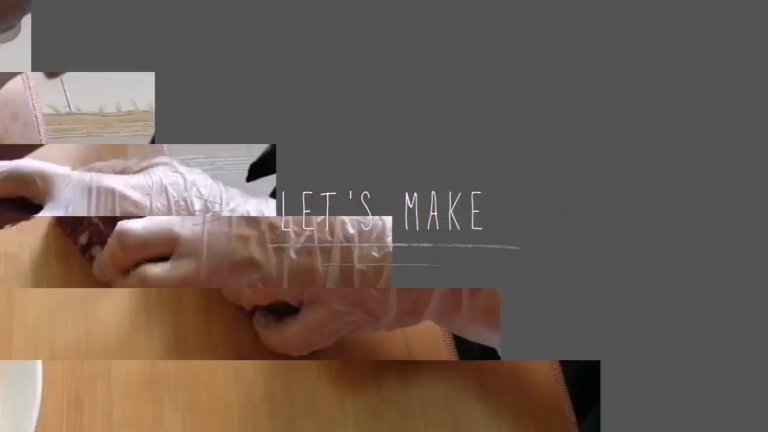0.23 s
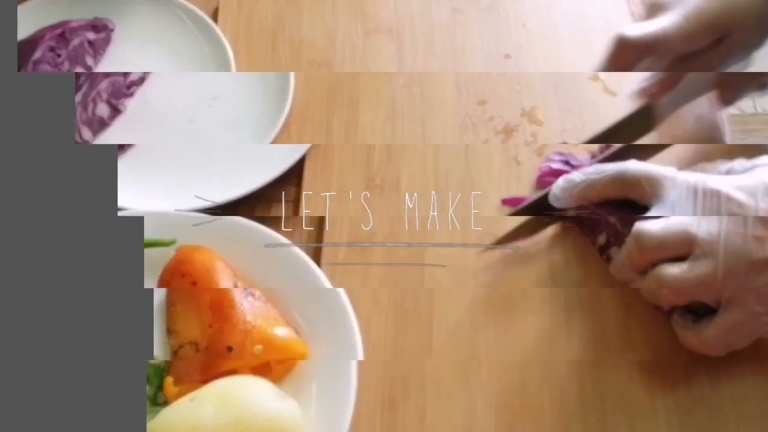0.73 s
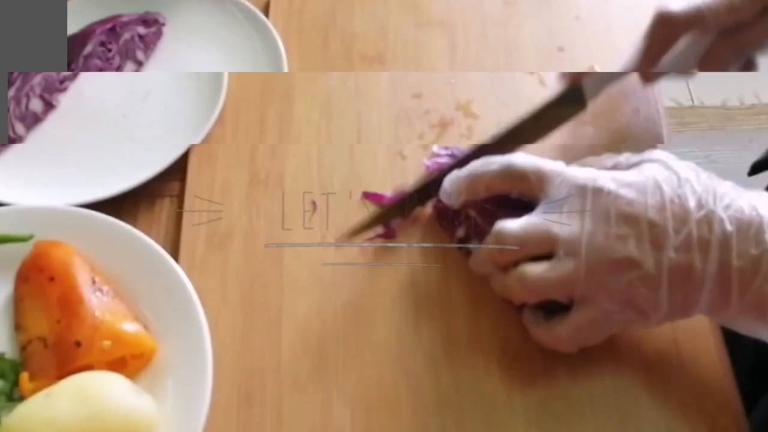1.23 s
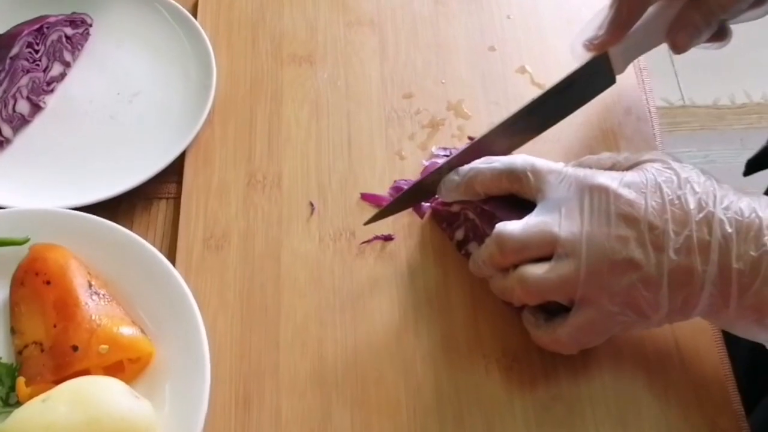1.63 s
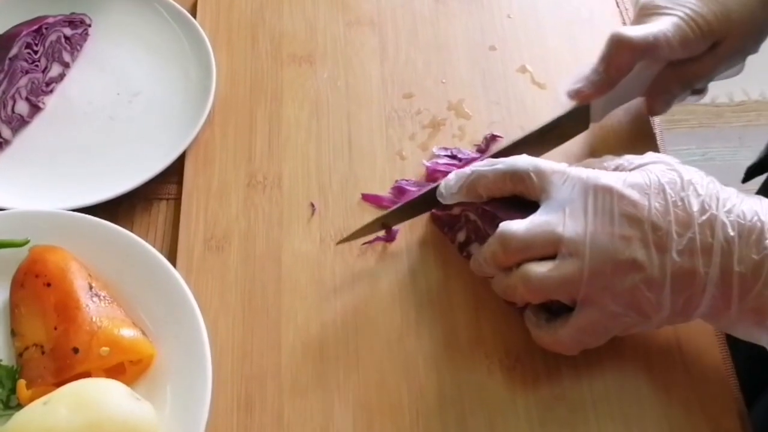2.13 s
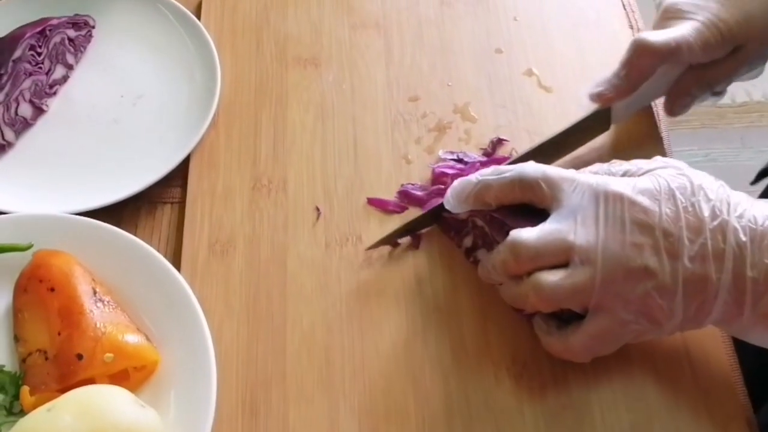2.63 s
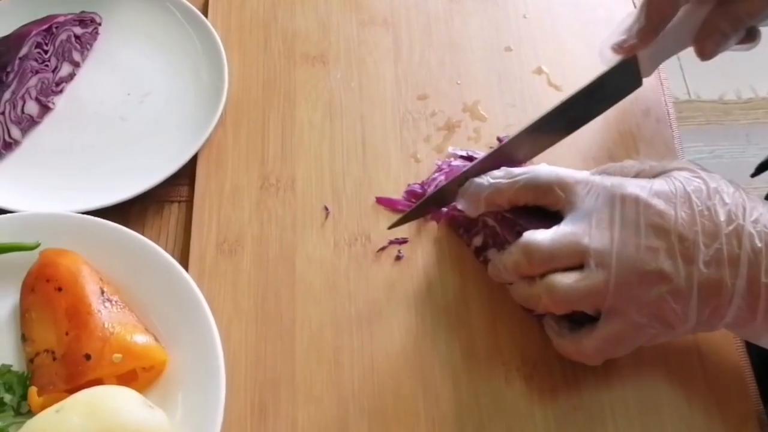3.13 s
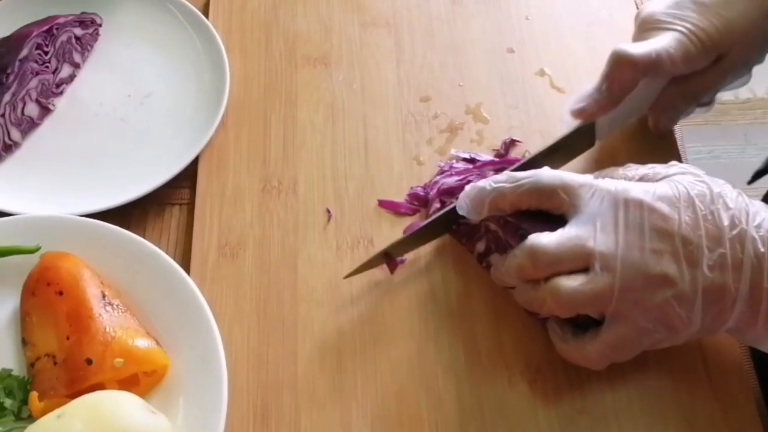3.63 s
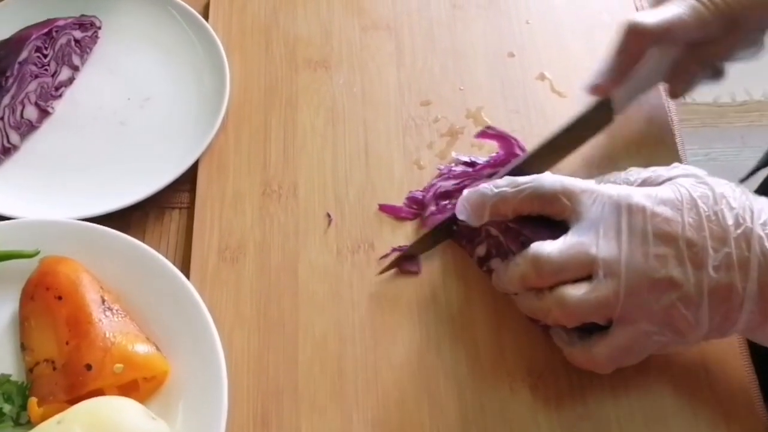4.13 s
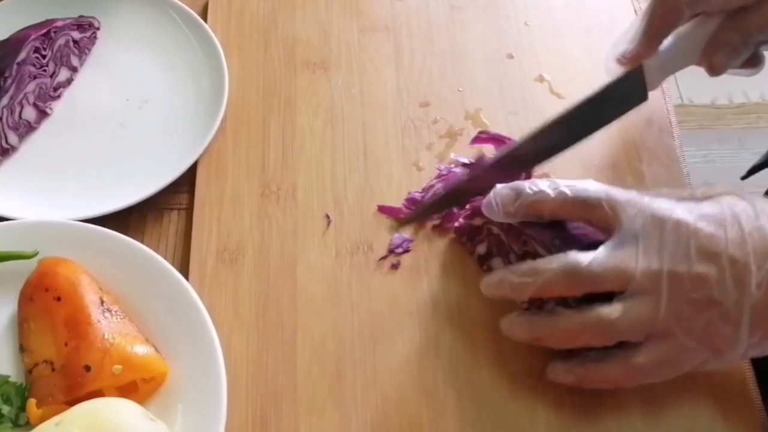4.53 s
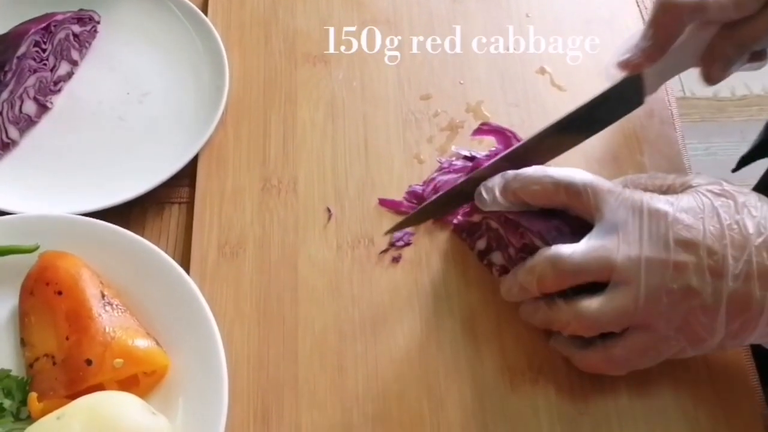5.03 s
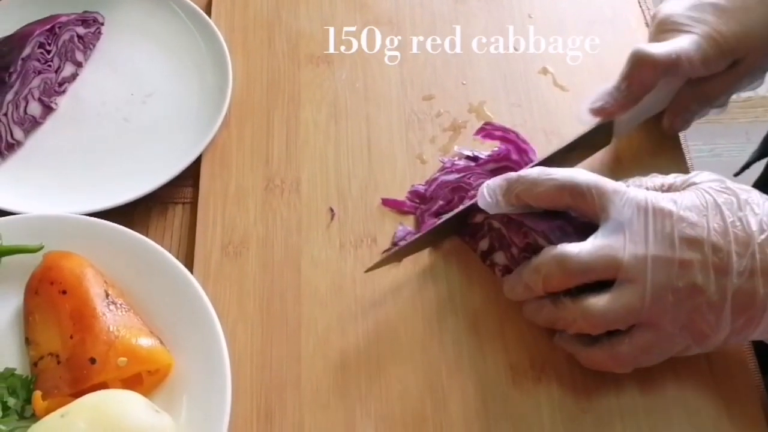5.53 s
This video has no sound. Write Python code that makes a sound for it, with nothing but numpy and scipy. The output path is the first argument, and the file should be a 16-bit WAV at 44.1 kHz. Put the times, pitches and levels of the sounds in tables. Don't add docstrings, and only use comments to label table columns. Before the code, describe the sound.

A knife cuts crisp cabbage on a small wooden board, heard close in stereo in a hard-walled kitchen. Uneven strokes crackle with tiny bright bursts and single snaps. Three short woody knocks end cuts near 1, 2.6 and 4 seconds, the second hardest and followed by a dull tap. Tearing is thickest after 5 seconds. Low room air and appliance hum lie underneath.

```python
import sys
import numpy as np
from scipy import signal
from scipy.fft import rfft, irfft
from scipy.io import wavfile
from scipy.ndimage import uniform_filter1d

SR = 44100
rng = np.random.default_rng(int(sys.argv[2]) if len(sys.argv) > 2 else 0)


def generate_wav(signal):
    frames = np.transpose(np.atleast_2d(signal))
    scaled = np.clip(frames, -1, 1) * 32767
    pcm = np.round(scaled).astype(np.int16)
    wavfile.write(sys.argv[1], SR, pcm)


def level_to_linear(level):
    exponent = np.asarray(level, float) / 20
    return 10 ** exponent


N = 254898


# full force at in seconds, swell in seconds, hold in seconds,
# tearing level in dB, board share in dB.
STROKES = [(0.463, 0.12, 0.054, -62, -2), (5.31, .05, 0.098, -64.5, -16), (0.714, 0.038, 0.052, -53, -12),
           (0.8, .01, 0.11, -67, -24), (1.059, .01, 0.094, -59.5, -1), (1.267, 0.14, 0.021, -59.5, -6),
           (1.978, .008, 0.075, -63.5, -1), (2.079, .003, 0.011, -53.5, -10),
           (2.26, 0.058, 0.043, -56.5, -3), (2.477, 0.17, .005, -65, -5), (3.336, 0.0027, .003, -72, -10),
           (3.476, .19, 0.026, -58.5, -7), (3.54, 0.034, 0.053, -61, -8), (3.658, 0.014, .035, -56.5, -7),
           (3.703, .012, 0.06, -53, 1.5), (4.027, .01, 0.044, -56.5, 1), (4.185, .014, 0.059, -67.5, 0.5),
           (4.275, .03, .05, -85, 1), (4.402, 0.034, .003, -65, -10), (5.122, 0.0079, 0.15, -62.5, -0.5),
           (5.254, .035, 0.019, -50.5, -6.5), (5.432, 0.09, 0.037, -49.5, 0), (5.72, 0.11, .02, -60.5, -2),
           (5.741, .006, .04, -53, 0.5)]
# frequency in Hz, gain in dB.
RIB_COLOUR = [(300, -42), (600, -10.5), (780, 1), (900, 2.5), (1100, -2.5), (1800, -8.5), (2600, -6.5),
              (3500, -6.5), (6000, -49)]
LEAF_COLOUR = [(500, -58), (1500, 0), (3000, -5), (5000, 4), (7000, -0.5), (9000, -10), (14000, -28.5)]
FIZZ_COLOUR = [(4000, -35.5), (7000, 2), (9000, 6), (12000, 5), (16000, -0.5)]


def tearing():
    fizz_db, release_db_per_s = -7.0, 404
    plunge_lead_s, plunge_db, plunge_board_db, plunge_fizz_db = 0.0044, -49, 1.5, -3.5
    t = np.arange(0, N, 32) / SR
    power = 0
    for full_s, swell_s, hold_s, db, board_db in STROKES:
        levels = level_to_linear([[db], [db + board_db], [db + fizz_db]])
        power = power + (force(t, full_s, swell_s, hold_s, release_db_per_s) * levels) ** 2
    plunge_levels = level_to_linear(plunge_db) * level_to_linear([[0], [plunge_board_db], [plunge_fizz_db]])
    for knock_s, *_, swell_s in KNOCKS:
        push = force(t, knock_s - plunge_lead_s, swell_s, plunge_lead_s, 10 * release_db_per_s)
        power = power + (push * plunge_levels) ** 2
    sample_s = np.arange(N) / SR
    leaf_level, rib_level, fizz_level = [np.interp(sample_s, t, row) for row in np.sqrt(power)]
    leaf, rib = cracks(5500), cracks(2000)
    shaking = 0.63 * leaf + 1.095 * rib
    leaf_sound = level_to_linear(-10.0) * signal.oaconvolve(leaf * leaf_level, unit(LEAF_COLOUR))[:N]
    rib_sound = level_to_linear(-9.0) * signal.oaconvolve(shaking * rib_level, unit(RIB_COLOUR))[:N]
    fizz_sound = level_to_linear(1.5) * signal.oaconvolve(leaf * fizz_level, unit(FIZZ_COLOUR))[:N]
    return leaf_sound + rib_sound + fizz_sound


def force(t, full_s, swell_s, hold_s, release_db_per_s, swell_db=23):
    climb_db = -swell_db * (np.maximum(full_s - t, 0) / swell_s)
    return level_to_linear(climb_db - release_db_per_s * np.maximum(t - full_s - hold_s, 0))


def cracks(per_s, uneven_db=3.5, clump_db=1.5):
    size = level_to_linear(uneven_db * np.minimum(rng.exponential(1, N), 4)) * rng.choice([-1., 1.], N)
    clumps = uniform_filter1d(rng.standard_normal(N), size=130)
    clumps = evened(uniform_filter1d(clumps, size=130))
    bursts = rng.random(N) < per_s / SR
    return evened(size * bursts * level_to_linear(clump_db * clumps))


def scattered(x, t60_s=.009, spread_db=3., turns_per_s=7):
    t, out = np.arange(800) / SR, np.zeros((2, N))
    for k in range(3):
        paths = rng.standard_normal((2, 800)) * level_to_linear(-60 * t / t60_s)
        z = rfft(paths, 1600)
        broad = np.sqrt(uniform_filter1d(abs(z) ** 2, size=14, axis=1))
        paths = irfft(z / broad)[:, :800]
        paths *= level_to_linear(spread_db) / np.linalg.norm(paths, axis=1, keepdims=True)
        turn = turns_per_s * np.arange(N) / SR + k / 3
        share = np.sqrt(2 / 3) * np.cos(np.pi * turn)
        out += signal.oaconvolve((share * x)[None], paths, axes=1)[:, :N]
    return out + x


# start in seconds, level in dB, board share in dB.
SNAPS = [(0.7058, -45, 9.5), (0.7636, -34, -11), (0.95, -35, -10), (0.9962, -21, -14), (1.232, -46, 0),
         (1.9817, -39.5, -9), (2.0838, -33, -12), (2.219, -40, -11), (2.247, -45, -13),
         (2.2977, -41.5, -12), (3.331, -41.5, 2), (3.4165, -42, -4), (3.477, -35, -10), (3.548, -46.5, -17),
         (3.5867, -46, 0), (3.661, -43, -11), (3.704, -33, 0), (3.7275, -29, -26), (3.773, -31, -16),
         (3.9629, -44, 2), (4.4056, -51, -9), (5.1239, -34.5, -1.5), (5.2088, -36, -17), (5.248, -47, 4.5),
         (5.2744, -43, -2), (5.3893, -45, -8), (5.433, -31.5, -1), (5.45, -32, 3), (5.462, -25, -2),
         (5.7423, -45, 2)]
# start in seconds, level in
# dB.
MORE_SNAPS = [(0.7508, -54), (0.971, -39), (1.1594, -43), (2.2382, -50), (2.2662, -43), (2.4878, -47.5),
              (2.7245, -36.5), (3.3912, -47), (3.6764, -42), (3.7154, -39), (3.7647, -41), (3.9435, -51),
              (3.976, -44), (5.136, -41), (5.1477, -47), (5.1965, -46), (5.3612, -54), (5.42, -31)]


def snaps():
    more_board_db, fizz_db, decay_s = 8, 0, .0009
    rows = SNAPS + [(start_s, db, more_board_db) for start_s, db in MORE_SNAPS]
    out, t = np.zeros((2, N + 2000)), np.arange(300) / SR
    afterclicks = rng.standard_normal((len(rows), 2, 300)) * np.exp(-t / decay_s) * .24
    afterclicks[:, :, 0] = 1
    leaf, rib, fizz = unit(LEAF_COLOUR), unit(RIB_COLOUR), unit(FIZZ_COLOUR)
    for (start_s, db, board_db), clicks in zip(rows, afterclicks):
        crack = leaf + level_to_linear(board_db) * rib + level_to_linear(fizz_db) * fizz
        sound = level_to_linear(db - 4.5) * signal.fftconvolve(clicks, crack[None], axes=1)
        out[:, round(start_s * SR):][:, :sound.shape[1]] += sound
    return out[:, :N]


# start in seconds, level in dB, edge brightness in dB, room level in dB,
# plunge swell in seconds.
KNOCKS = [
    (.9810, -15, 1.67, -6.5, 0.029),
    (2.581, -13, 2, -7.5, 0.035),
    (4.004, -16.5, -1.04, -11, 0.048),
]
# frequency in Hz, left port level in dB, right port level in dB.
BOARD_MODES = [(921, 5.5, -3.5), (1137, -6.5, 8), (1450, -37, -8), (2120, -4, -8), (2530, 0.5, -7.5),
               (3040, -7.5, -10.5), (4070, -12, -24), (4620, -17, -9.5), (5670, -15, -14),
               (7020, -11.5, -36), (8400, -39, -21), (9800, -24, -23)]
# frequency in Hz, gain in dB.
BLOW_COLOUR = [(300, -57), (600, -9), (850, 10.5), (1000, 4), (1200, 3.5), (1800, -2.5), (3000, -3),
               (4000, -7), (5300, -12), (7000, -16), (10000, -14.5), (15000, -16.5)]
# frequency in Hz, gain in dB.
BOARD_BASS_CUT = [(200, -22), (450, -13), (650, -4), (800, 0)]


def knocks():
    board_t60_s, rise_s, click_delay_s = .012, .0003, .0006
    t, near, far = np.arange(2600) / SR, np.zeros((2, N)), np.zeros(N)
    for start_s, db, edge_db, room_db, _ in KNOCKS:
        start = round(start_s * SR)
        tilt = [(1000, 0), (16000, 4 * edge_db)]
        blow = level_to_linear(db + room_db / 2) * colour(unit(BLOW_COLOUR), tilt)
        far[start:][:len(blow)] += 4.12 * blow
        click = level_to_linear(db - 36.0) * unit(FIZZ_COLOUR)
        near[:, round((start_s + click_delay_s) * SR):][:, :len(click)] += click
        for hz, *ports_db in BOARD_MODES:
            decay = level_to_linear(db - 9.0 + read(tilt, hz) - 60 * t / board_t60_s)
            ring = -(1 - np.exp(-t / rise_s)) * decay * np.sin(2 * np.pi * hz * t)
            near[:, start:][:, :len(t)] += level_to_linear(ports_db)[:, None] * ring
    return colour(near, BOARD_BASS_CUT) + kitchen(far)


# start in seconds, level in dB, push length in seconds.
TAP = (2.7243, -32, .0006)


def tap():
    start_s, db, length_s = TAP
    u = np.maximum(np.arange(N) / SR - start_s, 0) / length_s
    front = 1 - np.exp(-u / .25)
    return level_to_linear(db) * front * (1 - .6 * u) * np.exp(-.6 * u)


# frequency in Hz, gain in dB.
WALLS = [(200, -9), (500, -0.5), (850, 0), (1500, 1.5), (3000, 1.5), (6000, -1), (12000, 6.5)]


def echoes(cutting):
    return level_to_linear(-3.5) * kitchen(colour(cutting, WALLS))


# frequency in Hz, t60 in seconds.
ROOM_T60 = [(500, 0.35), (1300, 0.3), (3500, 0.35), (9000, 0.29), (15000, 0.25)]


def kitchen(x, gap_s=.003, rise_s=.002, alike_hz=1100.):
    taps = np.zeros((2, SR // 2))
    slots = np.arange(0, SR // 2 - 12, 12)
    at = slots + rng.integers(0, 12, (2, len(slots)))
    np.put_along_axis(taps, at, rng.choice([-1., 1.], at.shape), 1)
    hz, t, z = signal.stft(taps, SR, nperseg=128)
    same = np.exp(-(hz / alike_hz) ** 2)[:, None]
    z[1] = same * z[0] + np.sqrt(1 - same ** 2) * z[1]
    decay = level_to_linear(-60 * t / read(ROOM_T60, hz)[:, None])
    tail = signal.istft(z * decay, SR, nperseg=128)[1]
    tail *= np.clip((np.arange(tail.shape[1]) / SR - gap_s) / rise_s, 0, 1)
    return signal.fftconvolve(x[None], tail / np.linalg.norm(tail[0]), axes=1)[:, :N]


# frequency in Hz, level in dB.
AIR = [(20, 3), (32, -18), (60, -3), (150, 1.7), (300, -2.5), (600, -9), (1000, -22), (1600, -21.5),
       (2400, -23.5), (3100, -21), (4000, -27.5), (5000, -25.5), (8000, -22), (15000, -25)]
# frequency in Hz, correlation from 0 to 1.
LIKENESS = [(60, 1), (150, 0.77), (380, 0.86), (950, 0.16), (2380, 0.049), (5980, 0.028), (15000, 0.025)]
# frequency in Hz, width in Hz, level in dB.
HUM = [(24, 1.7, -70.5), (45.3, 2.1, -67), (98.46, 4, -67.5), (158, 6., -83), (193.7, 5.1, -67.5),
       (298, 3, -77.5), (447.5, 25, -69), (937, 400, -73.5)]


def air():
    air_db = -62
    frames, hz = N // 1024 + 6, np.fft.rfftfreq(8192, 1 / SR)
    a, b, c, d = rng.standard_normal((frames, len(hz), 4)).T
    same = np.clip(read(LIKENESS, hz), -1, .94)[:, None]
    left = a + 1j * b
    right = same * left + np.sqrt(1 - same ** 2) * (c + 1j * d)
    wide = level_to_linear(read(AIR, hz)) ** 2
    power = level_to_linear(air_db) ** 2 * wide / wide.sum()
    for centre_hz, width_hz, db in HUM:
        line = np.exp(-2 * ((hz - centre_hz) / width_hz) ** 2)
        power = power + level_to_linear(db) ** 2 * line / line.sum()
    z = np.array([left, right]) * np.sqrt(power)[:, None]
    sound = signal.istft(z, nperseg=8192, noverlap=7168)[1][:, :N]
    return np.sqrt(power.sum()) * evened(sound)


def evened(x):
    return x / np.sqrt(np.mean(x ** 2) + 1e-20)


def read(points, hz, column=1):
    points = np.array(points)
    return np.interp(np.log(hz + 1), np.log(points[:, 0] + 1), points[:, column])


def colour(x, points, column=1):
    hz = abs(np.fft.fftfreq(4096, 1 / SR))
    log_gain = np.log(level_to_linear(read(points, hz, column)))
    taps = np.fft.ifft(np.exp(log_gain - 1j * signal.hilbert(log_gain).imag)).real[:2048]
    taps = taps.reshape((1,) * (x.ndim - 1) + (-1,))
    return signal.oaconvolve(x, taps, axes=-1)[..., :x.shape[-1]]


def unit(points):
    taps = colour(np.eye(1, 1024)[0], points)
    return taps / np.linalg.norm(taps)


def scene():
    torn, snapped = tearing(), snaps()
    cutting = torn + snapped.mean(0)
    return scattered(torn) + snapped + knocks() + tap() + echoes(cutting) + air()


# frequency in Hz, left gain in dB, right gain in dB.
PORTS = [(282, -0.2, 0.74), (1310, 4, 3.5), (2330, 7, 3.9), (3220, 4.5, 6.5), (3770, -2, 1.5),
         (4690, 5, 10), (5275, 8, 19), (6260, -5, 9.5), (6480, 9.5, 6), (7740, -1, 3), (9350, 3, -3.5),
         (10230, -1, 0.5), (10600, -5.5, -4), (16100, -9, -6)]


def ports(dry):
    return np.array([colour(dry[k], PORTS, column=k + 1) for k in range(2)])


def gain_control(x):
    threshold_db, recovery_db_per_s, ratio, smoothing = -52.0, 90.0, 0.19, .0012
    power_db = 10 * np.log10(abs(uniform_filter1d((x ** 2).mean(0), size=440)) + 1e-12)
    fall_db = np.arange(N) * recovery_db_per_s / SR
    held_db = np.maximum.accumulate(power_db + fall_db) - fall_db
    over_db = np.maximum(held_db - threshold_db, 0)
    late_db = signal.lfilter([smoothing], [1, smoothing - 1], over_db)
    return x / level_to_linear(ratio * late_db)


def roll_off(x):
    return signal.sosfilt(signal.butter(12, 16500, fs=SR, output="sos"), x)


def record(dry):
    start_s, edge_hz = 0.0056, 15900
    x = gain_control(ports(dry))
    x = x * np.clip(np.arange(N) / SR / start_s, 0, 1) ** 2
    low_pass = signal.firwin(401, edge_hz, window=("kaiser", 4), fs=SR)
    mix = signal.oaconvolve(x, low_pass[None], "same")
    return roll_off(mix)


dry = scene()
out = record(dry)
generate_wav(out)
```